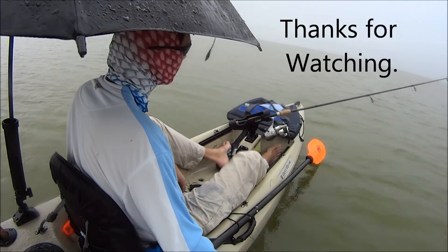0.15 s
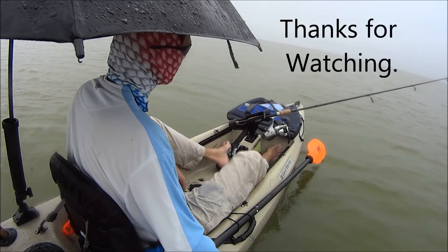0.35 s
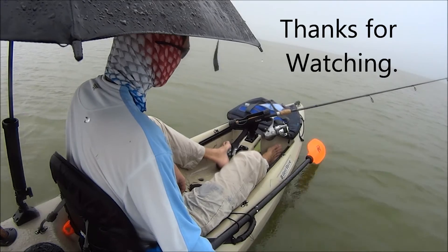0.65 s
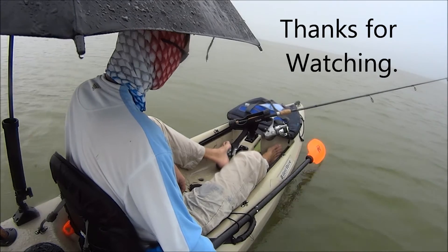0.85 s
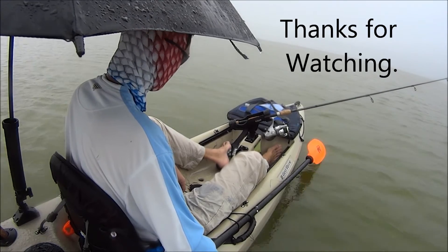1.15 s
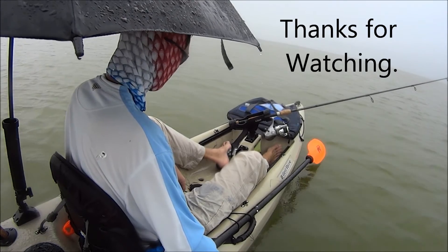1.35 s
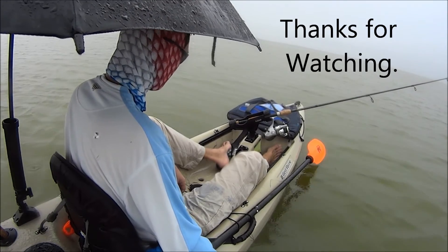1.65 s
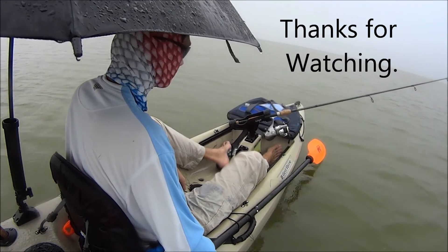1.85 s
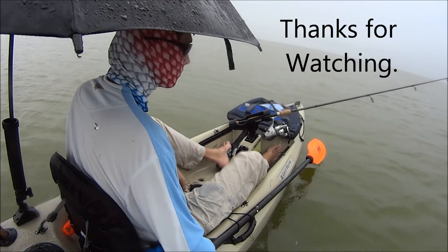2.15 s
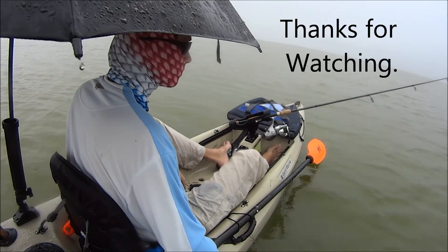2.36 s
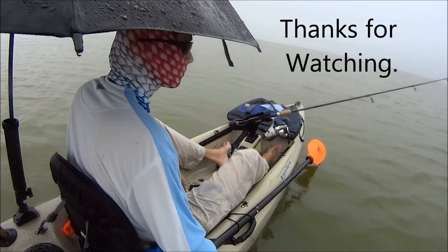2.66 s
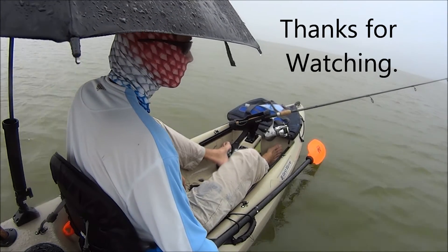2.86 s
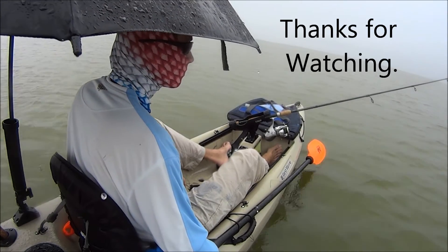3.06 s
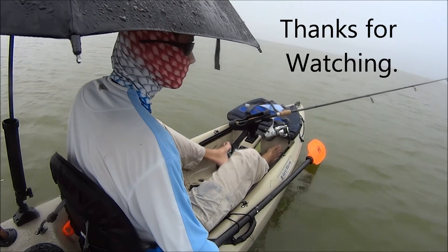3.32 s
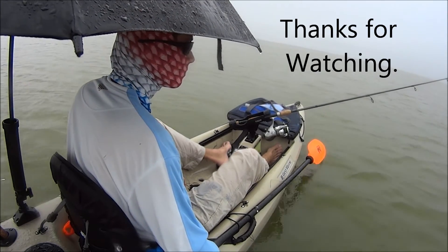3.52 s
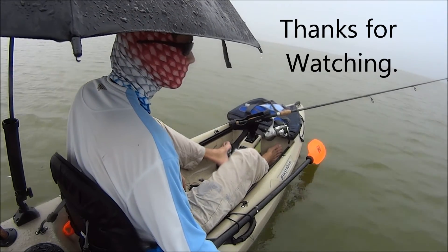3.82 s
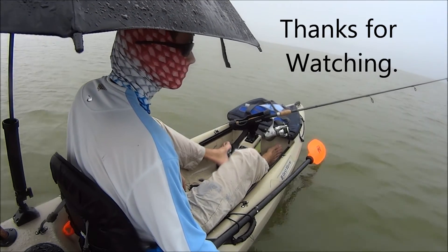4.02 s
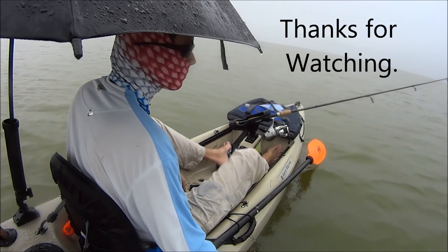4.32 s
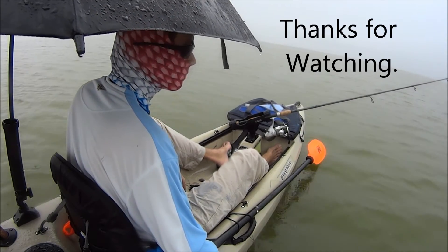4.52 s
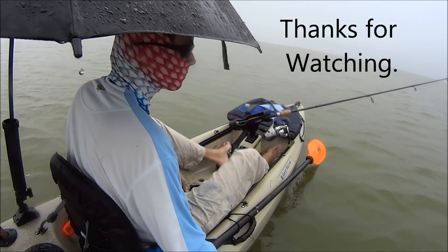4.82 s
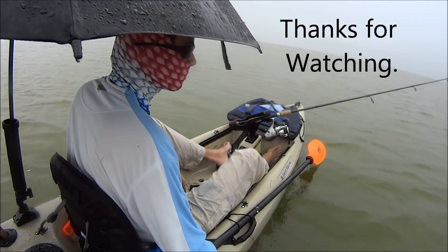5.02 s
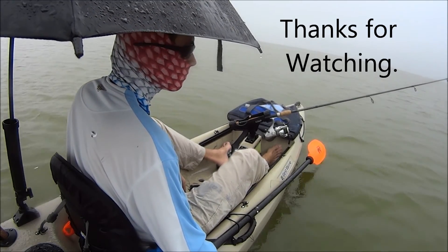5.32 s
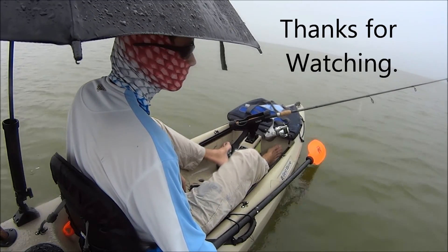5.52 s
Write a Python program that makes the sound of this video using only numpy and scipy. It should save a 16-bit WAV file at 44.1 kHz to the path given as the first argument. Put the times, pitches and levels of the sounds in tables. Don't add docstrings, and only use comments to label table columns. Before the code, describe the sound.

Close raindrops snap and tick on taut umbrella cloth, some bright with spray, some ringing briefly on a metal rib. Fine patter fills the gaps. Low wavelets rumble against a hollow plastic hull with a few soft thuds and glugs. Steady rain hiss spreads over open water. Stereo microphone an arm's length below the cloth, no room echo.

```python
import sys
import numpy as np
from scipy import signal
from scipy.fft import rfft, irfft
from scipy.io import wavfile
from scipy.ndimage import uniform_filter1d

SR = 44100
rng = np.random.default_rng(int(sys.argv[2]) if len(sys.argv) > 2 else 0)


def to_wav(sig):
    pcm = np.clip(np.atleast_2d(sig), -1, 1) * 32767
    pcm = np.round(pcm).astype(np.int16)
    wavfile.write(sys.argv[1], SR, pcm.T)


def nominal_scale(level):
    x = np.asarray(level, float) / 20
    return 10 ** x


N = 250469


def rms_one(x):
    return x / np.sqrt(np.mean(x ** 2) + 1e-20)


def at_hz(points, hz, column=1):
    points = np.array(points)
    return np.interp(np.log(hz), np.log(points[:, 0]), points[:, column])


def ring(clicks, hz, t60):
    radius, w = nominal_scale(-60 / (t60 * SR)), 2 * np.pi * hz / SR
    return signal.lfilter([0, np.sin(w)], [1, -2 * radius * np.cos(w), radius ** 2], clicks + 1e-18)


def resonances(x, modes):
    out = 0
    for k, (hz, width, db) in enumerate(modes):
        b, a = signal.iirpeak(hz, hz / width, fs=SR)
        out = out + (-1) ** k * nominal_scale(db) * signal.lfilter(b, a, x)
    return out


# (frequency [Hz], level [dB])
SPRAY = [(3800, -1.5), (5000, -1.5), (6300, -6.5), (7000, -4.5), (8300, -24.5), (9700, -12), (11000, -14),
         (12500, -11)]
# (frequency [Hz], level [dB], t60 [s])
RIBS = [(658.7, -18, 0.087), (723, -3.5, 0.037), (740, 1, 0.027)]
# (frequency [Hz], level [dB])
BOX = [(900, 2.5), (1250, 1.5), (1600, 5), (1900, -1), (2300, 4), (2800, 3), (3200, 1), (3800, 2.5)]
# (frequency [Hz], left lag [ms], left-right [dB])
OVERHEAD = [(750, .2, -1), (1100, .12, -3), (1550, .11, -5), (2450, .1, -4), (2900, .26, -2),
            (4500, .19, 0), (5600, .24, 3), (9500, .11, 0)]


def canopy(drops):
    s, peak_db, pitch_hz, bright_db, ring_db, pan_db = np.transpose(drops)
    splash_db, shiver_db, contact_s = -9.0, -16.0, .0005
    cloth_hz, spray_hz = np.geomspace(900, 3800, 13), np.geomspace(4100, 12400, 13)
    spread = np.clip(2 + bright_db / 18, .1, 1)
    slope_db = 19 - 6 * spread

    octaves = np.log2(cloth_hz[:, None] / pitch_hz)
    cloth = -slope_db * np.abs(octaves) + at_hz(BOX, cloth_hz)[:, None]
    cloth = cloth + (4.0 - 0.42 * spread) * octaves
    cloth = cloth - 10 * np.log10(np.sum(nominal_scale(cloth) ** 2, axis=0))
    spray = at_hz(SPRAY, spray_hz)[:, None] + bright_db + splash_db

    # (Hz, dB, t60 in s, lateness in contact times)
    modes = [(hz, db, 13.0 / hz ** .95, .14) for hz, db in zip(cloth_hz, cloth)]
    modes += [(hz * .94, db + shiver_db, 60.0 / hz, 5.0) for hz, db in zip(cloth_hz, cloth)]
    modes += [(hz, db, .006, 1.6) for hz, db in zip(spray_hz, spray)]
    modes += [(hz, db + ring_db, t60, .5) for hz, db, t60 in RIBS]

    chance = np.clip(rng.standard_normal((len(s), len(modes), 5)), -2, 2)
    out = np.zeros((2, N))
    for k, (hz, level_db, t60, late) in enumerate(modes):
        when = s + late * spread * contact_s * np.abs(chance[:, k, 0])
        apart = at_hz(OVERHEAD, hz) / 1000 + spread * .07 * chance[:, k, 1] / hz
        left_right_db = pan_db + at_hz(OVERHEAD, hz, column=2)
        clicks = np.zeros((2, N))
        for port, side in enumerate((1, -1)):
            at = np.clip((when + side * apart / 2) * SR, 0, N - 1).astype(int)
            own_db = spread * (1.2 * chance[:, k, 2] + 1.2 * chance[:, k, 3 + port])
            np.add.at(clicks[port], at, nominal_scale(peak_db + level_db + side * left_right_db / 2 + own_db))
        soft = np.exp(-2 * np.pi * 1.14 * hz / SR)
        push = signal.lfilter([(1 - soft) ** 2], [1, -2 * soft, soft ** 2], clicks + 1e-18)
        out += (-1) ** k * ring(push, hz, t60)
    no_bass = signal.butter(2, 520, "high", fs=SR, output="sos")
    return 2.206 * signal.sosfilt(no_bass, out)


# (time [s], peak [dB], cloth pitch [Hz], splash [dB], rib ring [dB])
RIB_DROPS = [(0.1535, -23, 3280, -4.5, -27), (0.9636, -31.5, 1110, -22, -12), (1.177, -29, 1850, -7, -7),
             (1.9292, -4, 2410, -10, -21.5), (2.1672, -22.5, 1530, -8, -28), (2.179, -11.5, 1890, -21, -7),
             (2.364, -48.5, 895, 10, 7), (2.6261, -20.5, 1200, -33, -11), (3.4941, -15, 1960, -8, -16.5),
             (3.6207, -21.5, 1600, -4, -17), (3.7728, -25.5, 2400, -11, -21), (4.2072, -26, 3680, 4, -12),
             (4.2307, -33.5, 1180, -0.5, -18), (4.4513, -28.5, 2010, -16.5, -11),
             (4.5032, -12, 2250, 1, -46), (4.5155, -26, 1590, 0.5, -5.5), (4.6677, -23.5, 2100, -1, -20),
             (4.6745, -12.5, 2100, -6.5, -19), (4.707, -26.5, 1580, -7, -12),
             (5.0638, -22.5, 2000, -2.5, -12.5), (5.4319, -9, 2700, -3, -12.5),
             (5.552, -18.5, 1530, -25, -16.5), (5.6, -22.5, 1750, 1.5, -19)]
# (time [s], peak [dB], cloth pitch [Hz], splash
# [dB])
CLOTH_DROPS = [(0.0846, -34, 1480, -11), (0.4944, -19, 1860, -8), (0.6172, -30.5, 1470, -10),
               (0.6768, -31, 2540, -10), (0.6974, -39.5, 970, -15), (0.7903, -29, 3900, -36),
               (0.8469, -19.5, 1920, -10), (0.962, -25.5, 3220, -2.5), (1.0355, -17, 1260, -22),
               (1.2051, -16.5, 1460, -8.5), (1.4983, -26.5, 2860, -5.5), (1.584, -25, 1720, 1.5),
               (1.7993, -19, 1830, -2.5), (2.1133, -34.5, 2440, -6), (2.5897, -31, 1560, -23),
               (2.7612, -28.5, 3460, 2), (2.8754, -33, 2660, 0.5), (3.348, -34, 1550, 0),
               (3.8073, -38, 1050, 5), (4.0048, -34, 1590, -21), (4.427, -26.5, 1480, -10),
               (4.8593, -30.5, 1490, -20.5), (4.947, -14, 1260, -31), (4.9974, -29.5, 1440, -9),
               (5.2793, -36.5, 1350, -7), (5.3846, -26.5, 3620, -11), (5.4831, -23, 1800, 0),
               (5.532, -18.5, 1460, -6), (5.5733, -34, 1550, -6), (5.6448, -29.5, 2800, 3.5),
               (0.028, -44, 2400, -3), (0.4235, -42, 2330, 0), (0.722, -40, 1660, 2.5),
               (0.874, -42, 2370, -33), (0.899, -44, 1000, -12), (1.079, -50, 900, -28),
               (1.124, -50, 1000, -14), (1.1978, -43, 3500, 6), (1.5042, -49, 2220, 12),
               (2.6852, -39, 2400, -18), (3.439, -38, 1050, -17), (3.591, -42.5, 1000, -5),
               (4.122, -43.5, 1300, -14), (3.6896, -38, 2610, -4), (3.9096, -43, 2410, -10),
               (4.2965, -39, 2560, -13), (4.655, -36, 1210, -21), (4.6817, -30, 2090, -10),
               (4.771, -38.5, 970, -26), (4.7965, -39, 2410, -3), (4.9396, -38, 1500, 1),
               (4.9799, -42, 3600, 3), (5.0741, -42, 1120, 1), (5.148, -39, 1730, -2),
               (5.202, -39.5, 1500, -2), (5.218, -43, 1150, -23.5), (5.4061, -41, 2370, -4),
               (5.42, -36, 2540, -3), (5.5425, -43, 2390, 8), (5.651, -38, 2630, 0)]
# (time [s], peak [dB], splash [dB])
TICKS = [(0.2016, -37, -2.5), (0.394, -35, -17), (0.4734, -35, -26), (0.553, -52, 16), (0.5715, -47.5, 11),
         (1.4036, -33, -28), (1.681, -33.5, -21), (2.0986, -41, -12), (2.5188, -41, -20),
         (2.657, -37, -2.5), (3.37, -34, -18), (3.4186, -37, -4), (3.4742, -33, -11), (3.6636, -33.5, -11),
         (4.273, -34, -30), (4.2871, -45, 14), (4.49, -33.5, -5), (4.56, -33, -14), (4.6044, -36.5, 4),
         (4.6112, -31.5, -25), (4.7174, -37, -10), (4.747, -37.5, -3), (4.8272, -29.5, -12),
         (4.8449, -42, 4), (4.9044, -40.5, 5), (5.0952, -36, -2), (5.2644, -30.5, -7), (5.3732, -33, -7),
         (5.5613, -31, 0), (5.6095, -33, -17.5)]


def single_drops():
    far_rib_db, tick_hz, tick_pan_db = -37, 2490, 6

    def pan_db(splash_db):
        return 1.9 + 0.06 * splash_db

    rib = [(*row, pan_db(row[3])) for row in RIB_DROPS]
    cloth = [(*row, far_rib_db, pan_db(row[3])) for row in CLOTH_DROPS]
    ticks = [(s, db, tick_hz, splash_db, far_rib_db, tick_pan_db) for s, db, splash_db in TICKS]
    return rib + cloth + ticks


def patter(count=900, level_db=-55.0, sizes_db=3.5):
    u = rng.random((count, 6))
    time_s = u[:, 0] * N / SR
    peak_db = level_db + sizes_db * np.minimum(-np.log(u[:, 1]), 3.5)
    pitch_hz = 1300 * 2.47 ** u[:, 2]
    splash_db, rib_db = -16 + 14 * u[:, 3], -26 + 14 * u[:, 4]
    pan_db = 2.7 * (u[:, 5] - .5)
    return np.transpose([time_s, peak_db, pitch_hz, splash_db, rib_db, pan_db])


# (time [s], peak [dB], pitch [Hz], t60 [s])
THUDS = [
    (0.846, -39, 294, 0.025),
    (1.203, -42.5, 280, 0.046),
    (2.177, -42, 210, 0.11),
    (3.065, -43, 302, 0.15),
    (3.621, -28.5, 387, 0.01),
    (4.2, -60, 397, 0.052),
    (4.707, -56, 211, 0.063),
    (5.527, -44, 480, 0.047),
    (5.5515, -24.5, 345, 0.0089),
]


def thuds():
    out, t = np.zeros(N), np.arange(N) / SR
    for s, peak_db, hz, t60 in THUDS:
        age = np.maximum(t - s, 0)
        envelope = nominal_scale(peak_db - 1 - 60 * age / t60) * (1 - np.exp(-age / 0.0011))
        out += envelope * np.sin(2 * np.pi * hz * age * (1 + 0.4 * age))
    return out


def swell(s, peak_db, rise, fall, calm_db):
    age = np.arange(0, N + 64, 64) / SR - s[:, None]
    each = nominal_scale(peak_db[:, None] + np.where(age < 0, rise, -fall) * age)
    level = np.sqrt(nominal_scale(calm_db) ** 2 + np.sum(each ** 2, axis=0))
    return np.interp(np.arange(N) / 64, np.arange(age.shape[1]), level)


# (frequency [Hz], width [Hz], level [dB])
HEAVE = [(36, 8, 0), (58, 11, -4), (84, 12, -18)]
# (frequency [Hz], width [Hz], level [dB])
SHELL = [(114.6, 23.3, -2), (145.2, 18, 4.5), (173.2, 23, -2)]
# (time [s], heave [dB], slap [dB])
WAVELETS = [(0.089, -55, -50.5), (0.17, -48.5, -47), (0.319, -44, -40.5), (0.409, -47, -44),
            (0.49, -49, -67), (0.82, -61, -58.5), (1.02, -54, -51.5), (1.11, -43, -46), (1.248, -45, -45.5),
            (1.31, -52, -66), (1.37, -51, -46), (2.06, -49.5, -64), (2.139, -46, -51.5), (2.21, -63, -55),
            (2.29, -49.5, -46), (2.42, -55, -60), (2.67, -72, -61), (2.97, -75, -61), (3.301, -67, -43),
            (3.35, -51, -51), (3.43, -55, -45.5), (3.56, -53, -52), (3.91, -55, -58.5), (3.97, -56, -67),
            (4.03, -74, -51.5), (4.51, -68, -57), (4.56, -43, -54.5), (4.63, -58, -44.5),
            (4.68, -45.5, -49), (4.75, -55, -47)]


def hull():
    s, heave_db, slap_db = np.transpose(WAVELETS)
    push = rng.standard_normal((4, N))
    heave = sum(resonances(p, [mode]) for p, mode in zip(push[1:], HEAVE))
    heave = resonances(heave, [(47, 127, 0)])
    slap = signal.sosfilt(signal.butter(4, 225, fs=SR, output="sos"), resonances(push[0], SHELL))

    def levelled(x):
        return x / np.sqrt(uniform_filter1d(x ** 2, size=5000) + 1e-12)

    rumble = levelled(heave) * swell(s, heave_db, rise=186, fall=136, calm_db=-68)
    rumble = rumble + levelled(slap) * swell(s, slap_db, rise=270, fall=183, calm_db=-68)
    apart = nominal_scale(-16.5) * np.gradient(rumble) * SR / (2 * np.pi * 120)
    return rumble * nominal_scale([[-.35], [.35]]) + apart * [[-1], [1]]


def drift(rate):
    return np.interp(np.arange(N) / SR * rate, np.arange(400), rng.standard_normal(400))


# (frequency [Hz], level [dB per Hz])
HISS = [(120, -40), (200, 0), (450, -3), (1200, -3.5), (1950, -4), (2450, -3), (3000, -4.5), (3600, -8),
        (4700, -9), (6000, -11.5), (6900, -12), (8100, -16.5), (9500, -13), (11000, -14)]
# (frequency [Hz], width [Hz], level [dB])
HOUSING = [(760, 110, -12), (1620, 280, -4), (2470, 390, -1)]
# (frequency [Hz], likeness [0-1], left lead [rad], left-right [dB])
PORTS = [(100, .92, 0, -.7), (270, .4, -.5, -.5), (600, .42, -3.1, -.7), (1150, .35, -3.2, -.5),
         (1600, .4, -2.2, -4), (2400, .72, -1.8, 1.6), (3800, .3, -1, 2), (4700, .25, -.4, 5),
         (6000, .25, -1, 2), (7700, .4, 0, 0), (9500, .55, -.3, 1), (11000, .55, -.1, .3)]


def far_rain():
    hz = np.maximum(np.fft.rfftfreq(N, 1 / SR), 20)
    gusts = nominal_scale(0.27 * drift(1.28) + 1.1 * drift(25))
    white = rng.standard_normal((2, N)) * gusts
    colour = nominal_scale(at_hz(HISS, hz)) * (hz < 11080)
    shared, own = rfft(white + resonances(white, HOUSING)) * colour
    alike = np.clip(at_hz(PORTS, hz), 0, 1)
    lead = np.exp(1j * at_hz(PORTS, hz, column=2))
    left = alike * lead * shared + np.sqrt(1 - alike ** 2) * own
    tilt = nominal_scale(at_hz(PORTS, hz, column=3) / 2)
    return nominal_scale(-53.0) * rms_one(irfft([left * tilt, shared / tilt], N))


def scene():
    drops = np.vstack([single_drops(), patter()])
    return canopy(drops) + thuds() + hull() + far_rain()


def low_pass(x):
    return signal.sosfilt(signal.butter(12, 12690, fs=SR, output="sos"), x)


def record(dry):
    mix = signal.sosfilt(signal.cheby2(10, 70, 13000, fs=SR, output="sos"), dry)
    return low_pass(mix)


dry = scene()
out = record(dry)
to_wav(out)
```